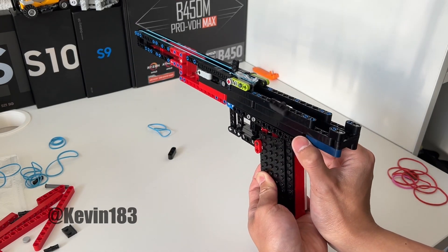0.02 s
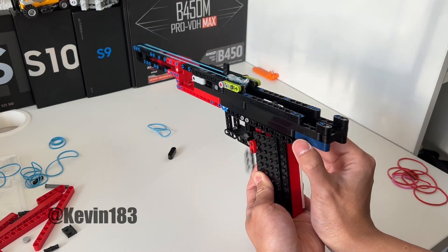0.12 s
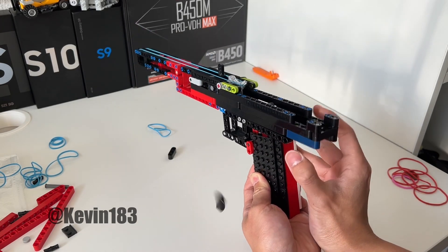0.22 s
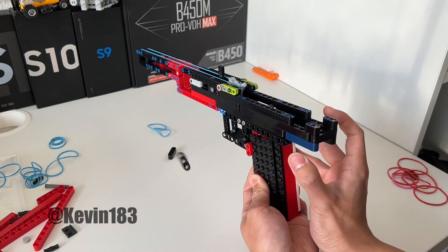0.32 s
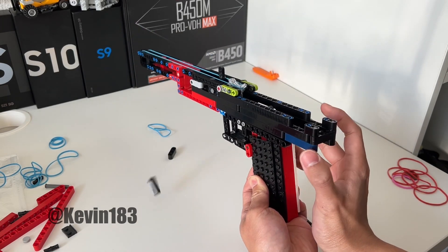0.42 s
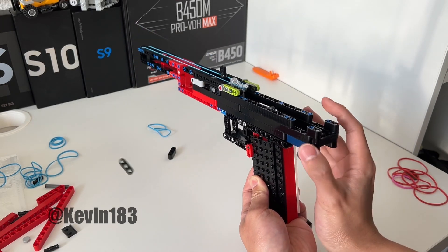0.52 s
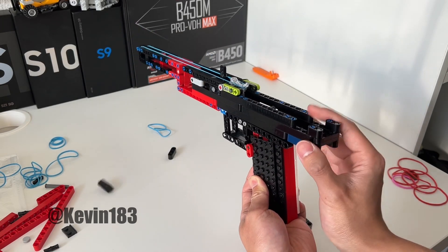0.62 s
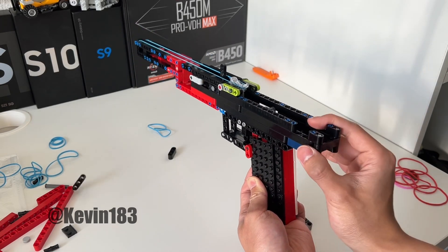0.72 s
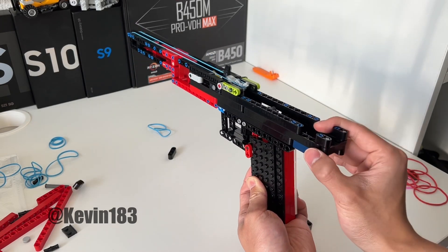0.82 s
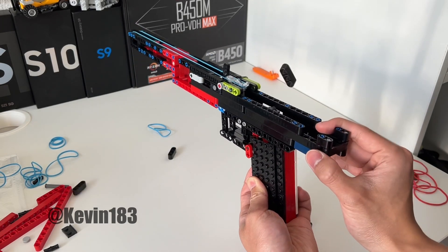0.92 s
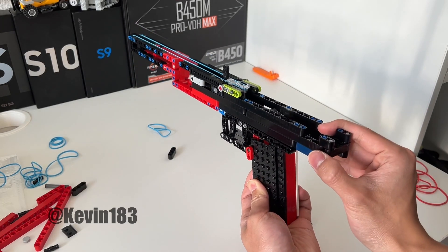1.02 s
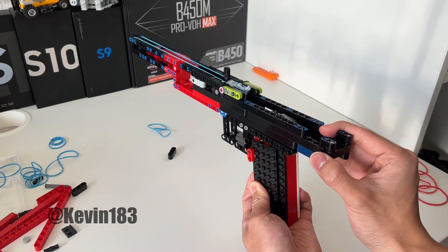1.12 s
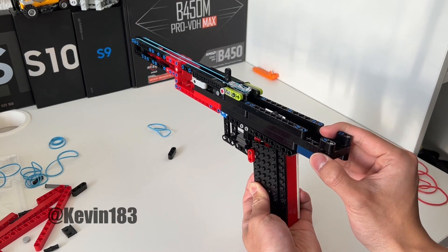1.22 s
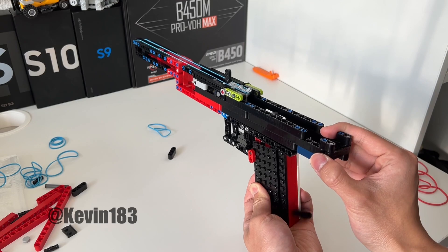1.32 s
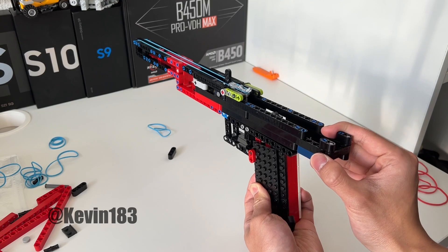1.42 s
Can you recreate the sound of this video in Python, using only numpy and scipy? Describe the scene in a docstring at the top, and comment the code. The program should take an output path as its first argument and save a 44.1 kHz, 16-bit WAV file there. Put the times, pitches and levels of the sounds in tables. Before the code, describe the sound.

A plastic toy pistol fires with a hard snap, its slide clacks back and then home, and the ejected brick rattles in quick bounces across a desk; small room, close stereo microphone.

```python
"""A toy pistol of plastic bricks is fired and racked above a desk in a small room.
The striker slams, the slide is pulled back and snaps home: cracks of shaped noise over damped pistol modes.
The ejected brick bounces and grazes the desk, ringing its modes, and loose pieces tick and knock.
Each crack has a second rattle as its desk reflection; a noise tail and low modes make the room.
Scraping, the fading room tail of an earlier click and a quiet rumble fill in beneath."""
import sys
import numpy as np
from scipy import signal
from scipy.fft import rfft, irfft
from scipy.io import wavfile
from scipy.ndimage import uniform_filter1d

SR = 44100
rng = np.random.default_rng(int(sys.argv[2]) if len(sys.argv) > 2 else 0)


def dump_mix(stems):
    """Bounce the given channels to the path in sys.argv[1] as a 16-bit WAV at rate SR."""
    frames = np.atleast_2d(stems).T  # one column per channel
    limited = np.clip(frames, -1, 1)  # hard clip at full scale
    pcm = np.round(limited * 32767).astype(np.int16)
    wavfile.write(sys.argv[1], SR, pcm)


N = 66150

# background rumble colour: frequency_hz, gain_db
RUMBLE_COLOUR = [(20, -22), (65, 5.5), (110, -9.5), (250, -19.5), (800, -25), (2000, -30.5), (6000, -42),
                 (16000, -61.5)]
# decay of the room tail: frequency_hz, t60_s
ROOM_DECAY = [(100, 0.12), (400, 0.44), (1200, 0.21), (2200, 0.35), (4500, 0.33), (8000, 0.29),
              (16000, 0.29)]
# tone of the room tail: frequency_hz, gain_db
ROOM_TONE = [(60, 3), (110, 1.5), (180, 5.7), (400, -7.5), (1000, -1.2), (2200, -3), (5000, 0.15),
             (8000, -1.9), (12000, -7.5), (16000, -16)]
# low room resonances that swell after each contact: frequency_hz, level_db, t60_s
ROOM_BOOMS = [(121, -6, .2), (185.6, 0, 0.12)]
# light knocks of parts settling: start_s, level_db, pitch_hz, crack_db
SETTLING_KNOCKS = [(1.1704, -9.5, 2730, 3.5), (1.3272, -22, 1900, -5.5), (1.4319, -30.5, 1850, -11.5)]
# resonances shared by all knocks: frequency_hz, level_db, t60_s
FRAME_MODES = [(1470, -7, .018), (4300, -12, .025)]
# sharp ticks of brick on brick: start_s, level_db, tilt_db_per_octave, rattle_t60_s
BRICK_TICKS = [(0.031, -17.5, -2, 0.018), (0.0371, -17.5, -2.5, 0.021), (0.1365, -23, -5, 0.02),
               (0.191, -21, -5, 0.0089), (0.8553, -12, -4, 0.023), (0.865, -7.5, -0.5, 0.014),
               (1.0515, -7, -4.5, 0.025), (1.063, -3.5, -6.5, 0.047), (1.071, -2, 8, 0.008),
               (1.2285, -20.5, -5.5, 0.026)]
# landings of the ejected brick: start_s, level_db, tilt_db_per_octave
BRICK_BOUNCES = [(0.748, -9.5, 2.5), (0.774, -4.5, 1), (0.801, 0, 0.5), (0.8283, -9.5, 0),
                 (0.8668, -5.5, 3), (0.890, -3.5, 1), (0.9032, -6.5, 2), (0.9383, -8, 1.5),
                 (0.9499, -11, 1.5), (0.9636, -6, 5.5), (0.9997, -8.5, 5), (1.0194, -10, 2),
                 (1.038, -12.5, 7)]
# desk resonances: frequency_hz, level_db, t60_s
DESK_RESONANCES = [(474, -0.5, 0.037), (879, 1.5, 0.033), (2070, 3.5, 0.05), (3270, -4.5, 0.18),
                   (5135, 1, 0.0082)]
# scrapes of sliding parts: start_s, end_s, level_db
SCRAPES = [(0.199, 0.2437, -41), (0.455, 0.474, -38)]
# striker contacts: start_s, level_db, rattle_t60_s, room_send_db
STRIKER_BLOWS = [(0.2238, 5, 0.0023, -11.5), (0.2254, 12, 0.0085, -1.5)]
# slide reaching its rear stop: start_s, level_db, rattle_t60_s, room_send_db
SLIDE_BACK_BLOWS = [(0.4694, 8.73, 0.024, 0.1)]
# slide snapping home: start_s, level_db, rattle_t60_s, room_send_db
SLIDE_HOME_BLOWS = [(0.6543, -1, 0.0037, 5), (0.6587, 8.5, 0.023, -5)]
# pistol resonances: frequency_hz, t60_s, striker_db, slide_back_db, slide_home_db
PISTOL_RESONANCES = [(186, 0.057, -24, -18.5, -16), (309, 0.23, -24, -13.5, -21),
                     (460, 0.062, -23, -14.5, -13.5), (537.4, 0.15, -11, -19, -23),
                     (619.6, 0.042, -11.5, -18, -21), (887, .075, -22, -20, -10.5),
                     (1166, 0.055, -23, -20.5, -21), (1316, 0.074, -21.5, -13.5, -23.5),
                     (1830, 0.071, -14.5, -13, -11), (2262, 0.026, -4.5, -13, -13),
                     (3260, .075, -25, -14, -25)]
# colour of each kind of sound (the rub tone also colours the opening tail): frequency_hz, gain_db
KNOCK_TONE = [(700, -14), (2000, 6.5), (4300, 6.5), (6000, -3.5), (12000, -18), (16000, -40)]
TICK_TONE = [(200, -32), (900, -18.5), (1800, -4), (5000, -0.5), (7500, 5.5), (12000, 0.5), (16000, -8.5)]
BOUNCE_TONE = [(100, -9), (250, -12.5), (480, -5.5), (2100, 1), (5500, -7), (8000, -9), (12000, -26.5),
               (16000, -36.5)]
RUB_TONE = [(900, -3), (1800, 1.5), (5500, -1.5), (7500, -11), (11000, -23.5)]
STRIKER_TONE = [(35, -46), (60, -13.5), (363, -10), (553, -4), (800, -6), (1050, -2), (1580, -4),
                (2350, 0.8), (4120, -11), (7940, -24), (9130, -36), (10500, -25.5), (16000, -38)]
SLIDE_BACK_TONE = [(59, -46.5), (100, -15), (1200, -2.5), (2930, -1), (5650, -3.5), (8280, -6.5),
                   (9410, -14.5), (10900, -10), (16000, -34.5)]
SLIDE_HOME_TONE = [(59, -57.5), (100, -18), (1450, -7), (1800, 1), (7610, -2), (9410, -4.5), (11600, -8),
                   (16000, -23)]
# microphone response, both channels: frequency_hz, gain_db
MIC_RESPONSE = [(7800, 0.05), (8800, -4.5), (9600, -20.5), (10600, 4.5), (11800, 8), (13200, 3.5),
                (14500, 6), (15700, -6)]
# right channel relative to left: frequency_hz, gain_db
RIGHT_OVER_LEFT = [(120, -1), (350, 2), (2300, 1.4), (4000, 4.5), (5800, 9), (8000, 0), (12000, -0.5)]

SIZE = 16384  # samples per crack or ring
RUMBLE_DB, RUMBLE_CUT_HZ = -67.5, 28
ROOM_DELAY_S, ROOM_BUILD_S = 0.0028, 0.0042
BOOM_DB, BOOM_DELAY_S = -12.5, 0.008
RING_ROOM_DB, BOUNCE_ROOM_DB, TICK_ROOM_DB, KNOCK_ROOM_DB = -14, -2.5, -1, -1  # room sends
SNAP, TICK_SNAP = 0.28, 2  # height of the first pulse over a rattle of unit energy
PORT_SPREAD = 0.77  # how unlike the two channels' noise is
PORT_LAG_S, SLIDE_LAG_S = 0.00024, 0.0002  # right channel's first pulse is late: ticks, slide
RATTLE_TILT_DB = -1  # per octave, before the crack is evened out
ECHO_S, PISTOL_ECHO_DB, BOUNCE_ECHO_DB, TICK_ECHO_DB = 0.0027, -1, 0, 0
SWELL_CYCLES = 1.5  # time constant of a mode's onset
KNOCK_T60_S, BOUNCE_T60_S = 0.011, 0.011
CHATTER_START_S, CHATTER_END_S, CHATTER_COUNT = 0.58, 0.84, 22
CHATTER_DB, CHATTER_TILT_DB = -15, -5  # loudest click; steepest treble loss per octave
DESK_RING_DB, DESK_SCATTER_DB = -4.5, 4  # ring under a click; random spread of each mode
TAIL_DB, TAIL_T60_S, TAIL_TILT_DB = -54.5, 0.53, 4.5  # opening tail: level before its fade, decay, tilt per octave
NEAR_CUT_HZ, TOP_HZ = 400, 17000


def undb(db):
    """Turn decibels into an amplitude factor."""
    return 10 ** (np.asarray(db) / 20)


def unit(x):
    """Scale to an energy of 1, averaged over the channels."""
    return x / np.sqrt(np.mean(np.sum(x ** 2, -1)))


def fade(t60, size):
    """Exponential decay by 60 dB in t60 seconds."""
    return np.exp(-np.log(1000) * np.arange(size) / SR / max(t60, 1e-4))


def curve(points, size):
    """Interpolate (Hz, value) points over log frequency onto the bins of a spectrum."""
    hz, value = np.array(points, float).T
    bins_hz = np.fft.rfftfreq(size, 1 / SR)
    return np.interp(np.log(bins_hz + 1), np.log(hz), value)


def causal(x, gain):
    """Minimum-phase filter with the given gain per bin, so nothing sounds ahead of its onset."""
    size = 2 * (gain.shape[-1] - 1)
    cepstrum = irfft(np.log(gain + 1e-9))
    cepstrum[..., 1:size // 2] *= 2
    cepstrum[..., size // 2 + 1:] = 0
    response = np.exp(rfft(cepstrum))
    return irfft(rfft(x, size) * response)[..., :x.shape[-1]]


def colour(x, points, tilt_db=0):
    """Filter by (Hz, dB) points, tilted per octave about 4 kHz; the tilt levels off below 500 Hz."""
    size = 2 * x.shape[-1]
    octaves = np.log2(np.maximum(np.fft.rfftfreq(size, 1 / SR), 500) / 4000)
    return causal(x, undb(curve(points, size) + tilt_db * octaves))


def whiten(x, size):
    """Even out the broad spectrum, keeping the fine grain."""
    power = np.abs(rfft(x, 2 * x.shape[-1])) ** 2
    smooth = uniform_filter1d(power, size=size, axis=-1)
    return unit(causal(x, 1 / np.sqrt(smooth + 1e-12)))


def highpass(x, hz):
    """Second-order bass cut."""
    return signal.sosfilt(signal.butter(2, hz, "high", fs=SR, output="sos"), x)


def noise(spread, size):
    """Two-channel noise; spread 0 is alike in both, 1 unrelated."""
    mid, side = rng.standard_normal((2, size))
    return (mid + spread * side * np.array([[1], [-1]])) / np.hypot(1, spread)


def add(out, x, start_s):
    """Mix a sound in at a time."""
    i = int(np.clip(start_s * SR, 0, N - 1))
    out[:, i:i + x.shape[1]] += x[:, :N - i]


def rattle(t60):
    """Loose joints buzz briefly: a decaying burst of tilted noise."""
    burst = noise(PORT_SPREAD, SIZE) * fade(t60, SIZE)
    return unit(colour(burst, [(1000, 0)], RATTLE_TILT_DB))


def crack(t60, echo_db, snap=SNAP, lag_s=0):
    """A sharp pulse with the rattle of the joints, and a second rattle as its reflection off the desk."""
    direct, echo = rattle(t60), rattle(t60)
    direct[0, 0] += snap
    direct[1, int(lag_s * SR)] += snap
    reflection = undb(echo_db) * np.roll(echo, int(ECHO_S * SR), axis=1)
    return whiten(unit(direct) + reflection, size=250)


def ring(modes, scatter_db=0):
    """Damped modes that swell over a few cycles; the higher ones are more out of step between ports."""
    t = np.arange(SIZE) / SR
    out = 0
    for hz, db, t60 in modes:
        chance = rng.standard_normal((3, 1))
        phase = min(hz / 3000, 0.6) * chance[:2]
        swell = 1 - np.exp(-t * hz / SWELL_CYCLES)
        mode = unit(np.sin(2 * np.pi * hz * t + phase) * swell * fade(t60, SIZE))
        out = out + undb(db + scatter_db * chance[2]) * mode
    return out


def rumble():
    """A quiet bed of bass-heavy noise, nearly alike in both channels."""
    return undb(RUMBLE_DB) * np.sqrt(N) * unit(colour(noise(0.14, N), RUMBLE_COLOUR))


def room(x):
    """Diffuse tail in octave bands, each with its own decay; the bass is more alike left and right."""
    size = 2 * SIZE
    t = np.arange(size) / SR
    centres = 62.5 * 2. ** np.arange(9)
    decay_hz, decay_s = np.array(ROOM_DECAY).T
    t60s = np.interp(np.log(centres), np.log(decay_hz), decay_s)
    tail = 0
    for hz, t60, share in zip(centres, t60s, np.eye(len(centres))):
        band = np.sqrt(curve(list(zip(centres, share)), size))
        grain = irfft(rfft(noise(min(hz / 800, 0.95), size)) * band)
        tail = tail + grain * fade(t60, size)
    build = np.clip((t - ROOM_DELAY_S) / ROOM_BUILD_S, 0, 1)
    tail = whiten(tail * build, size=250)
    return signal.fftconvolve(x, colour(tail, ROOM_TONE), axes=1)[:, :N]


def boom(x):
    """The room's low modes answer a little late."""
    out = np.zeros((2, N))
    low_modes = highpass(ring(ROOM_BOOMS), 90)
    answer = signal.fftconvolve(x.mean(0, keepdims=True), low_modes, axes=1)
    add(out, undb(BOOM_DB) * answer, BOOM_DELAY_S)
    return out


def opening_tail():
    """The room tail of an earlier click dies away: noise under an exponential fade."""
    tail = unit(colour(noise(PORT_SPREAD, N), RUB_TONE, TAIL_TILT_DB))
    yield 0, undb(TAIL_DB) * np.sqrt(N) * tail * fade(TAIL_T60_S, N), -12


def knocks():
    """A soft tap rings the part at its own pitch and the frame around it, along with a crack."""
    for start_s, db, hz, crack_db in SETTLING_KNOCKS:
        tap = unit(colour(crack(KNOCK_T60_S, TICK_ECHO_DB), KNOCK_TONE))
        body_ring = ring([(hz, 0, KNOCK_T60_S)] + FRAME_MODES)
        yield start_s, undb(db) * unit(body_ring + undb(crack_db) * tap), KNOCK_ROOM_DB


def ticks():
    """Hard little contacts with almost no body: the shorter the rattle, the stronger the snap."""
    for start_s, db, tilt_db, t60 in BRICK_TICKS:
        snap = TICK_SNAP * np.exp(-t60 / BOUNCE_T60_S / 2)
        click = crack(t60, TICK_ECHO_DB, snap, PORT_LAG_S)
        yield start_s, undb(db) * unit(colour(click, TICK_TONE, tilt_db)), TICK_ROOM_DB


def chatter():
    """The brick's edges graze the desk at random times, with random strength and dullness."""
    for when, strength, dull in rng.random((CHATTER_COUNT, 3)):
        click = crack(BOUNCE_T60_S, BOUNCE_ECHO_DB, TICK_SNAP)
        click = unit(colour(click, BOUNCE_TONE, dull * CHATTER_TILT_DB))
        start_s = CHATTER_START_S + when * (CHATTER_END_S - CHATTER_START_S)
        yield start_s, undb(CHATTER_DB) * strength * click, BOUNCE_ROOM_DB


def bounces():
    """The tumbling brick lands on corner after corner and rings the desk differently each time."""
    for start_s, db, tilt_db in BRICK_BOUNCES:
        click = unit(colour(crack(BOUNCE_T60_S, BOUNCE_ECHO_DB), BOUNCE_TONE, tilt_db))
        desk = undb(DESK_RING_DB) * unit(ring(DESK_RESONANCES, DESK_SCATTER_DB))
        yield start_s, undb(db) * (click + desk), BOUNCE_ROOM_DB


def rubs():
    """Sliding parts scrape: coloured noise with a rising level."""
    for start_s, end_s, db in SCRAPES:
        size = max(int((end_s - start_s) * SR), 64)
        scrape = colour(noise(PORT_SPREAD, size), RUB_TONE) * np.linspace(0, 1, size)
        yield start_s, undb(db) * np.sqrt(size) * unit(scrape), -4


def body():
    """The last contact at each stop rings the pistol's modes in its own mix."""
    out = np.zeros((2, N))
    for stop, table in enumerate((STRIKER_BLOWS, SLIDE_BACK_BLOWS, SLIDE_HOME_BLOWS)):
        start_s, db = table[-1][:2]
        modes = [(hz, mix[stop], t60) for hz, t60, *mix in PISTOL_RESONANCES]
        add(out, undb(db) * ring(modes), start_s)
    return out


def blows():
    """Striker and slide hit their stops with a crack and a rattle of the joints."""
    for table, tone, lag_s in (
        (STRIKER_BLOWS, STRIKER_TONE, 0),
        (SLIDE_BACK_BLOWS, SLIDE_BACK_TONE, SLIDE_LAG_S),
        (SLIDE_HOME_BLOWS, SLIDE_HOME_TONE, SLIDE_LAG_S),
    ):
        for start_s, db, t60, room_db in table:
            hit = crack(t60, PISTOL_ECHO_DB, SNAP, lag_s)
            yield start_s, undb(db) * unit(colour(hit, tone)), room_db


def scene():
    """All contacts, the opening tail, the room's answer and a quiet rumble."""
    direct, sent = np.zeros((2, 2, N))
    for source in (opening_tail, knocks, ticks, chatter, bounces, rubs, blows):
        for start_s, sound, room_db in source():
            add(direct, sound, start_s)
            add(sent, undb(room_db) * sound, start_s)
    ringing = body()
    near = highpass(direct + ringing, NEAR_CUT_HZ)
    tail = room(sent + undb(RING_ROOM_DB) * ringing)
    return near + tail + boom(sent) + rumble()


def record(dry):
    """Small microphone ports shape the treble, the right one mostly brighter; bass and top are cut."""
    right_db = curve(RIGHT_OVER_LEFT, 2 * N)
    balance_db = np.array([-right_db, right_db]) / 2
    heard = causal(dry, undb(curve(MIC_RESPONSE, 2 * N) + balance_db))
    limited = np.clip(highpass(heard, RUMBLE_CUT_HZ), -1, 1)
    top_cut = signal.ellip(8, 0.2, 80, TOP_HZ, fs=SR, output="sos")
    return signal.sosfilt(top_cut, limited)


dry = scene()
out = record(dry)
dump_mix(out)
```